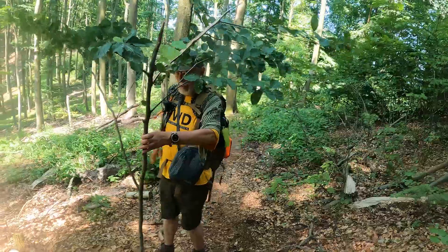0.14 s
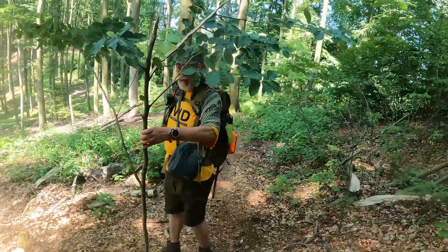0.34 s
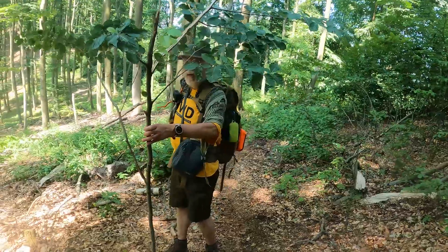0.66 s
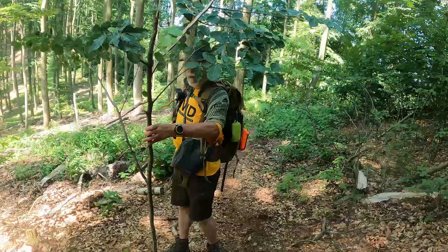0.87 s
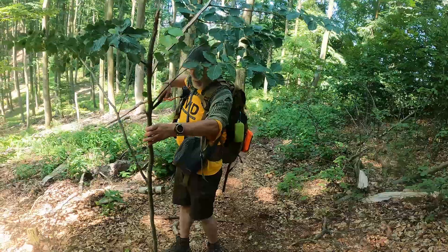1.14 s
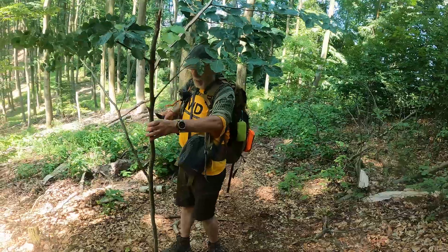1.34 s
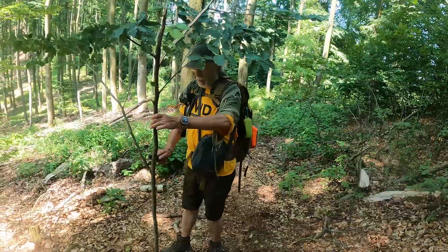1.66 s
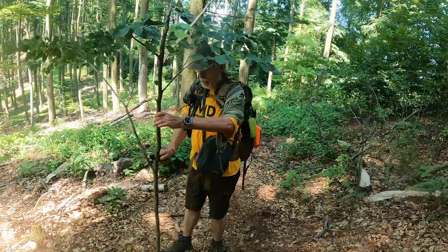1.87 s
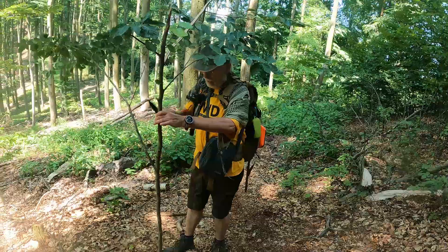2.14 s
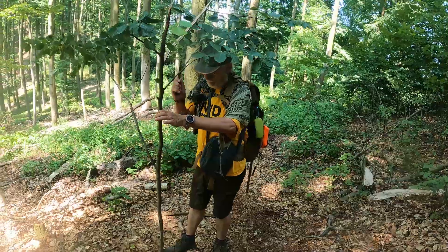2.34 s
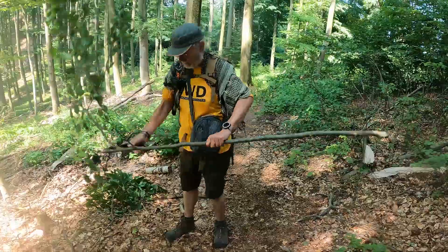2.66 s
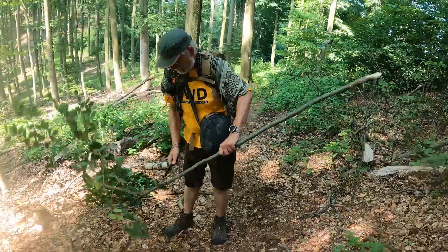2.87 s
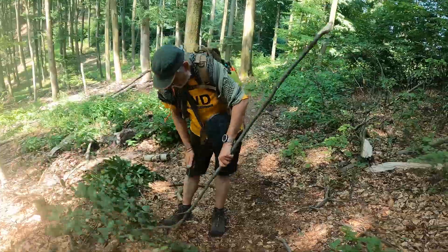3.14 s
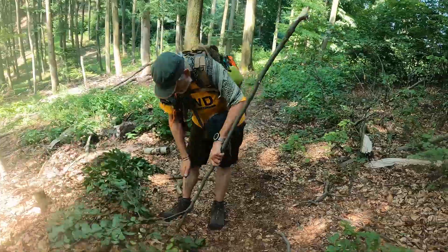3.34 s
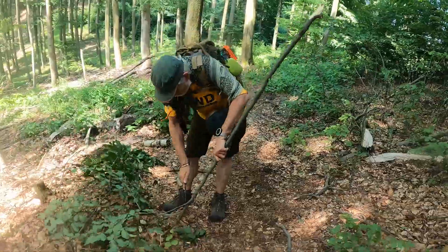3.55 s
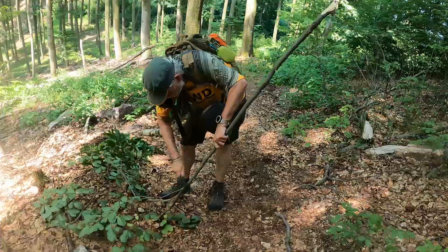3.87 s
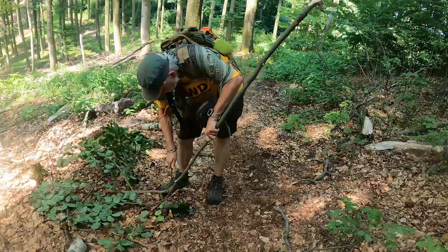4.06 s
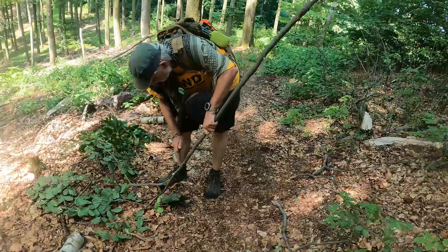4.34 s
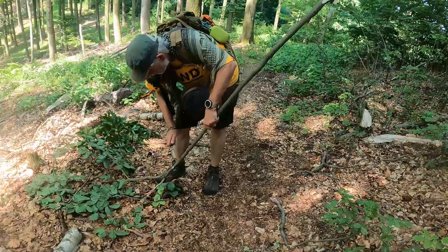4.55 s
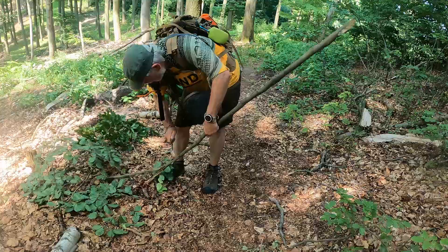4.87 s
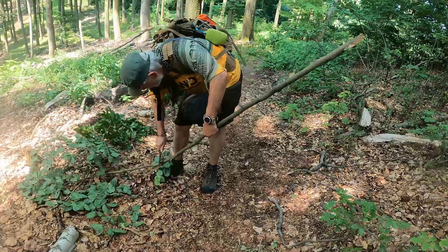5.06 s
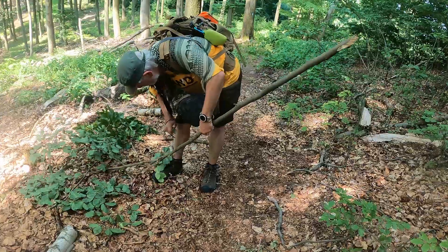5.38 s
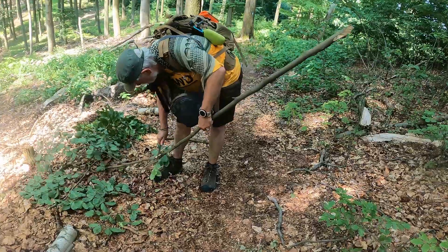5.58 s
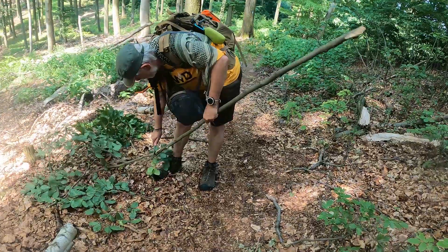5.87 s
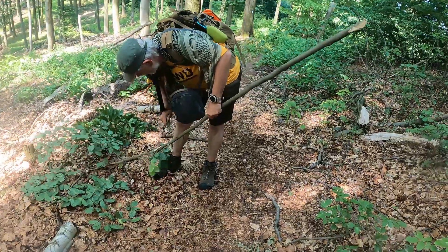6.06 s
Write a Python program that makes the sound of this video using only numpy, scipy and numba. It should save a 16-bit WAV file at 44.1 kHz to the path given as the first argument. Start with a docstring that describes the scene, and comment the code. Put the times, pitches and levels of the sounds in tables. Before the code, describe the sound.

A small close microphone picks up someone chopping a leafy branch on a forest floor. Quiet rustling and scuffing is broken by isolated hard, splintering cuts; after the middle the rustle becomes loud, crisp and uneven, full of bright twig cracks. The later cuts give short woody knocks and bursts of shaken leaves, ending on one more cut as the crackle fades.

```python
"""Cutting a leafy branch

In a wood, someone trims a leafy branch with a blade and drags it over dry litter, close to a small microphone.
Leaves crackle as dense tiny damped sines under a slow gain; clothes and ground scuff as duller, noisier grains.
Cuts and cracks are bursts of damped sines, one for each parting fibre; a cut also rings the stick's modes
and shakes the leaves and ground. Soft thumps are single low damped sines, smoothed by a low pass."""
import sys
import numpy as np
from scipy import signal
from scipy.fft import rfft, irfft
from scipy.io import wavfile
from scipy.ndimage import uniform_filter1d
from numba import njit

SR = 44100
rng = np.random.default_rng(int(sys.argv[2]) if len(sys.argv) > 2 else 0)


def put_to_file(sound):
    """Save the sound as 16-bit audio at rate SR, in the file named by the first command-line argument."""
    columns = np.atleast_2d(sound).T  # one column per channel
    safe = np.clip(columns, -1, 1)
    whole_steps = np.round(safe * 32767)
    wavfile.write(sys.argv[1], SR, whole_steps.astype(np.int16))


N = 274279
TIME = np.arange(N) / SR  # s

# All levels are those ahead of the microphone; split bursts and thumps are also filtered after they are set.
# Slow background of stirring between the sweeps: time_s, rustle_db, scuff_db
BACKGROUND = [(0.0, -41.5, -45), (0.09, -47.5, -50), (0.56, -51, -49.5), (0.73, -49, -46),
              (0.885, -52, -52), (0.938, -60.5, -60), (0.98, -50.5, -58), (1.19, -55.5, -53),
              (1.27, -56, -60), (1.494, -58.5, -62), (1.54, -50, -55), (1.715, -50.5, -48),
              (2.03, -52.5, -54), (2.23, -57, -56), (2.55, -60.5, -59), (2.65, -50, -57.5),
              (3.13, -50, -49.5), (3.66, -42.5, -49.5), (4.02, -34, -43.5), (4.34, -45, -49),
              (4.43, -48, -53), (4.78, -33.5, -47.5), (5.0, -33.5, -50), (5.13, -41.5, -47),
              (5.94, -44.5, -53.5), (6.22, -45.5, -48)]
# Sweeps of the branch through the litter: peak_s, rustle_db, scuff_db, fade_t60_s
LITTER_SWEEPS = [(0.277, -47.5, -54, 0.29), (0.439, -60, -46.5, 0.33), (1.021, -46, -41.5, 0.21),
                 (1.084, -44, -42, .6), (1.33, -48, -57, 0.64), (2.157, -46, -65, 0.39),
                 (2.69, -30, -40.5, 0.75), (2.76, -36.5, -48.5, 0.61), (2.92, -44, -51, 0.56),
                 (3.186, -34.5, -48.5, 1), (3.323, -30.5, -39, 0.96), (3.385, -27.5, -45, 0.31),
                 (3.495, -32, -45.5, 0.64), (3.615, -39.5, -46, 0.16), (4.139, -26.5, -36, .5),
                 (4.205, -31, -40.5, .5), (4.24, -31.5, -46, 0.27), (4.285, -29, -40, .25),
                 (4.48, -33, -52, 1), (4.53, -31, -45.5, .7), (4.718, -30, -48, .6),
                 (5.279, -29, -40.5, 0.52), (5.699, -34, -42, 0.16), (5.754, -40.5, -50, 0.15),
                 (5.84, -41, -63, 0.45), (6.055, -30, -38.5, 0.36)]
SWELL_DB_PER_S = 339  # how fast a sweep builds up
# Spectrum of the leaf crackle: frequency_hz, gain_db
LEAF_SPECTRUM = [(150, -30), (500, -19.5), (1000, -5), (2400, 6.5), (3700, 5.5), (5200, 2.5), (7000, -3.5),
                 (14000, -15)]
# Spectrum of the scuffing: frequency_hz, gain_db
SCUFF_SPECTRUM = [(120, -3), (250, -2.5), (380, -6.5), (650, -1), (1000, -5.5), (2000, -5.5), (6000, -50.5)]
# Breaking twigs and stiff leaves: start_s, peak_db, pitch_hz, splitting_ms
TWIG_CRACKS = [(0.079, -30, 1430, 4.3), (.263, -16.5, 2210, 3.7), (.489, -31, 1840, 13),
               (0.506, -28, 2020, 23.7), (1.0088, -28, 1930, 23.4), (1.068, -29, 1480, 37),
               (1.122, -29, 1210, 16.6), (1.219, -27, 3020, 6.5), (1.248, -25.5, 2650, 7.7),
               (1.284, -28, 3030, 9.8), (1.518, -34.5, 2470, 19.4), (1.552, -33, 1870, 9.1),
               (2.600, -30, 1520, 9.1), (2.6715, -21.5, 3450, 8.7), (2.709, -16.5, 4500, 9.5),
               (2.874, -22, 3220, 4.7), (2.905, -20.5, 3390, 8.4), (3.023, -23, 3200, 5.25),
               (3.1035, -28, 3260, 23.5), (3.171, -24, 2920, 25), (3.198, -12.5, 4470, 4.3),
               (3.312, -10.5, 3120, 4.3), (3.400, -12.5, 4440, 3.16), (3.677, -21, 4100, 3),
               (3.906, -15.5, 4050, 4), (4.0557, -4.5, 4300, 6), (4.095, -10.5, 3600, 9.7),
               (4.131, -15, 4340, 3.3), (4.147, -13, 2800, 7.4), (4.1735, -20, 3500, 6),
               (4.267, -19, 3360, 11), (4.709, -14.5, 3740, 7.1), (4.792, -19.5, 2200, 12),
               (5.076, -12, 3460, 6.1), (5.253, -16, 3280, 6.5), (5.580, -15, 4800, 7),
               (5.681, -20, 4450, 4.3), (5.701, -19.5, 5570, 4.4), (5.712, -19, 5200, 4.4),
               (6.031, -14.5, 3520, 5)]
# Small cracks at random: dB of crack rate for each dB of rustle, least peak above the rustle, mean excess over it
CHANCE_FOLLOWS, CHANCE_DB, CHANCE_SCATTER_DB = .6, 3, 3.0
CHANCE_HZ, CHANCE_MS = 3830, 4.5  # middle pitch, splitting time
# Soft thumps on the ground: start_s, level_db, pitch_hz
GROUND_THUMPS = [(0.421, -26, 282), (2.051, -29, 237), (3.11, -29, 424), (4.037, -45, 218),
                 (4.101, -20.5, 253), (5.987, -29, 247)]
# Blade cuts: start_s, peak_db, lower_wood_hz, upper_wood_hz, knock_db, splitting_ms,
# shaken_leaves_db, jolted_ground_db, shaking_t60_s
BLADE_CUTS = [(1.198, -2.5, 2260, 4070, -58, 6, -32.5, -47.5, 0.45),
              (2.041, -9, 2220, 2900, -39, 13, -32.5, -37.5, 0.23),
              (2.61, -3, 2700, 4700, -32, 10.1, -55, -62, .2),
              (3.2751, -5, 3600, 4500, -41, 3.1, -28.5, -46, 0.63),
              (4.0299, -2, 1900, 3570, -24.5, 5, -21.5, -31.5, 0.32),
              (5.2266, -5, 2730, 3220, -18.5, 8.1, -23, -30, 0.38),
              (5.612, -5, 2950, 3640, -26, 19.4, -22.5, -36, 0.4),
              (5.9713, -3, 2400, 3800, -40, 15, -22, -34, 0.44)]
# Modes of the knocked stick: pitch_hz, level_db (added to knock_db), t60_s
STICK_MODES = [(661, 0.5, 0.041), (810, -12, 0.077), (1160, -22, 0.06)]
# Housed microphone, with a bass cut, a notch near 9 kHz and steps down to the top: frequency_hz, gain_db
MICROPHONE = [(25, -40), (90, -24.5), (170, 0), (5000, 0), (7000, -1.5), (8000, -9), (8800, -16.5),
              (9060, -28), (9300, -14.5), (10000, -9.5), (11400, -8), (12100, -31), (13200, -15.5),
              (14200, -58)]
TOP_HZ = 15500  # edge of the final low pass


def undb(db):
    """Decibel law: amplitude ratio of a level in dB."""
    return 10 ** (np.asarray(db) / 20)


def unit(x):
    """Normalisation to a root mean square of one."""
    return x / np.sqrt(np.mean(x ** 2))


def colour(x, table):
    """Minimum-phase filtering: folding the cepstrum of the log gain gives a causal response."""
    hz, db = np.transpose(table)
    bins = np.fft.rfftfreq(4096, 1 / SR)
    gain_db = np.interp(np.log(bins + 1), np.log(hz), db)
    cepstrum = irfft(np.log(undb(gain_db)))
    cepstrum[1:2048] *= 2
    cepstrum[2049:] = 0
    response = irfft(np.exp(rfft(cepstrum)))[:2048]
    return signal.fftconvolve(x, response)[:len(x)]


@njit
def ring(n, rate, s, hz, t60, size):
    """Modal superposition: a damped sine for each start, pitch, decay and size, cut off after its t60."""
    out = np.zeros(n)
    for k in range(len(s)):
        turn = np.exp(2j * np.pi * hz[k] / rate - np.log(1000) / (t60[k] * rate))  # rotation and decay per sample
        phasor = size[k] + 0j
        start = int(s[k] * rate)
        for i in range(max(start, 0), min(start + int(t60[k] * rate), n)):
            out[i] += phasor.imag
            phasor *= turn
    return out


def walk(rate):
    """Slow random modulation: levels held 1 / rate s and smoothed twice, with a spread near 1."""
    hold = int(SR / rate)
    held = np.repeat(rng.standard_normal(N // hold + 1), hold)
    return 1.35 * uniform_filter1d(uniform_filter1d(held, hold), hold)[:N]


def swept(column):
    """Addition of powers: level in dB of the background plus sweeps, each a quick swell and a slower fade."""
    background, sweeps = np.transpose(BACKGROUND), np.transpose(LITTER_SWEEPS)
    power = undb(np.interp(TIME, background[0], background[column])) ** 2
    for peak_s, db, t60 in zip(sweeps[0], sweeps[column], sweeps[-1]):
        drop_db = np.maximum(SWELL_DB_PER_S * (peak_s - TIME), 60 * (TIME - peak_s) / t60)
        power = power + undb(db - drop_db) ** 2
    return 10 * np.log10(power)


def stirred(level_db, jolt_db):
    """Exponential decay: gain that follows the dragging, plus a sudden shaking that dies away after each cut."""
    power = undb(level_db) ** 2
    for cut, db in zip(BLADE_CUTS, jolt_db):
        start_s, t60 = cut[0], cut[-1]
        fade_db = 60 * np.clip(TIME - start_s, 0, 2) / t60
        power = power + (TIME > start_s) * undb(db - fade_db) ** 2
    return np.sqrt(power)


def crackle(count, cycles, scatter_db, hiss_db, low_hz, high_hz):
    """Impulsive noise: many tiny snaps of any pitch, a few much larger, over the blur of distant ones."""
    s, place, luck, sign = rng.random((count, 4)).T
    hz = low_hz * (high_hz / low_hz) ** place
    scatter = undb(-scatter_db * np.log(1 - luck))
    size = hz * scatter * np.sign(sign - .5)  # size grows with pitch: a flat spectrum
    snaps = ring(N, 1. * SR, s * N / SR, hz, cycles / hz, size)
    return unit(snaps) + undb(hiss_db) * rng.standard_normal(N)


def leaves(rustle_db):
    """Amplitude modulation: leaf crackle clumps; small and large leaves stir partly on their own."""
    out = 0
    clumps_db = 1.76 * walk(45)
    for edges_hz in [(100, 2500), (2500, 5000), (5000, 18000)]:
        grains = crackle(count=40000, cycles=10.0, scatter_db=2.5, hiss_db=1.5, low_hz=304.0, high_hz=15000.0)
        band = signal.sosfilt(signal.butter(2, edges_hz, "band", fs=SR, output="sos"), grains)
        out = out + band * undb(clumps_db + 1.0 * walk(24.88))
    shaken_db = np.transpose(BLADE_CUTS)[6]
    return stirred(rustle_db, shaken_db) * unit(colour(out, LEAF_SPECTRUM))


def scuffing(scuff_db):
    """Friction noise: dull rubbing of cloth and soil, grainy and uneven."""
    grains = crackle(count=4000, cycles=17.2, scatter_db=1.0, hiss_db=10.0, low_hz=100.3, high_hz=2910.0)
    jolted_db = np.transpose(BLADE_CUTS)[7]
    uneven = undb(1.4 * walk(25.03))
    return stirred(scuff_db, jolted_db) * uneven * unit(colour(grains, SCUFF_SPECTRUM))


def split(s, peak_db, hz, ms, count, spread, cycles, fade_db, onset, woody):
    """Progressive fracture: fibres part one after another in each break, a quick swell, then fainter ones."""
    out = np.zeros(N + SR)
    draws = rng.standard_normal((len(s), count, 3)).transpose(0, 2, 1)
    for k, (jitter, detune, size) in enumerate(draws):
        when = (np.arange(count) + np.tanh(jitter) + 1) / (count + 1)  # as a fraction of the break
        rings = np.arange(count) % 2  # every other fibre sounds a pitch of the wood, which lasts longer
        wood_hz = np.resize(np.repeat(hz[k], 2), count)
        pitch = np.clip(wood_hz * np.exp(np.where(rings, .05, spread) * detune), 300, 15000)
        size = size * np.minimum(when / onset, 1) * undb(-fade_db * when) * np.where(rings, woody, 1)
        size = size * (pitch / np.mean(hz[k])) ** .8  # thin fibres radiate little bass
        t60 = cycles * np.where(rings, 2.2, 1) / pitch
        burst = ring(SR // 10, 1. * SR, when * ms[k] / 1000, pitch, t60, size)
        start = int(s[k] * SR)
        out[start:start + len(burst)] += burst * undb(peak_db[k]) / np.abs(burst).max()
    return signal.sosfilt(signal.butter(2, 550, "high", fs=SR, output="sos"), out[:N])


def cracks(rustle_db):
    """Brittle fracture: twigs and stiff leaves break as listed, and small ones at random with the rustle."""
    place_s, luck, place_hz = rng.random((90, 3)).T
    busy = np.cumsum(undb(rustle_db * CHANCE_FOLLOWS))  # more of them break while the rustle is loud
    s = np.interp(place_s * busy[-1], busy, TIME)
    peak_db = np.interp(s, TIME, rustle_db) + CHANCE_DB - CHANCE_SCATTER_DB * np.log(1 - luck)
    hz = CHANCE_HZ * 2 ** (place_hz - .5)  # within one octave
    chance = np.transpose([s, peak_db, hz, np.full(len(s), CHANCE_MS)])
    s, peak_db, hz, ms = np.concatenate([TWIG_CRACKS, chance]).T
    return split(s, peak_db, hz, ms, count=40, spread=0.367, cycles=21.0, fade_db=14.5, onset=0.062, woody=0.48)


def thumps():
    """Damped resonance: each soft knock is a low ring, its start made gentle by a low pass."""
    s, level_db, hz = np.transpose(GROUND_THUMPS)
    knock = ring(N, 1. * SR, s, hz, np.full(len(s), .09), undb(level_db - 7.5))
    return signal.sosfilt(signal.butter(2, 450, fs=SR, output="sos"), knock)


def cuts():
    """Fracture and modal excitation: the blade splits fibres and knocks the stick, which rings briefly."""
    s, peak_db, low_hz, high_hz, knock_db, ms, *_ = np.transpose(BLADE_CUTS)
    wood_hz = np.transpose([low_hz, high_hz])
    sound = split(s, peak_db, wood_hz, ms, count=48, spread=0.628, cycles=14.1, fade_db=19.0,
                  onset=0.074, woody=0.72)
    for mode_hz, db, t60 in STICK_MODES:
        held_hz = mode_hz * (1 + 0.032 * rng.standard_normal(len(s)))  # the grip shifts the modes
        sound += ring(N, 1. * SR, s, held_hz, np.full(len(s), t60), undb(knock_db + db))
    return sound


def scene():
    """Linear superposition of all the sources, as one channel."""
    rustle_db, scuff_db = swept(1), swept(2)
    dragging = leaves(rustle_db) + scuffing(scuff_db)
    breaking = cuts() + cracks(rustle_db)
    return (dragging + breaking + thumps())[None]


def record(dry):
    """Linear filtering: microphone colour, then a steep low pass cuts the top."""
    coloured = colour(dry[0], MICROPHONE)[None]
    return signal.sosfilt(signal.ellip(8, .2, 70, TOP_HZ, fs=SR, output="sos"), coloured)


dry = scene()
out = record(dry)
put_to_file(out)
```